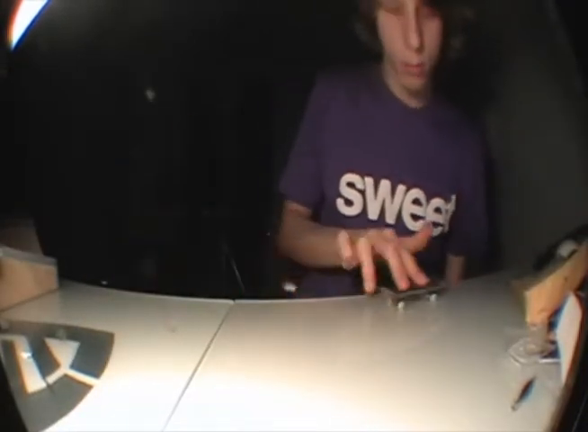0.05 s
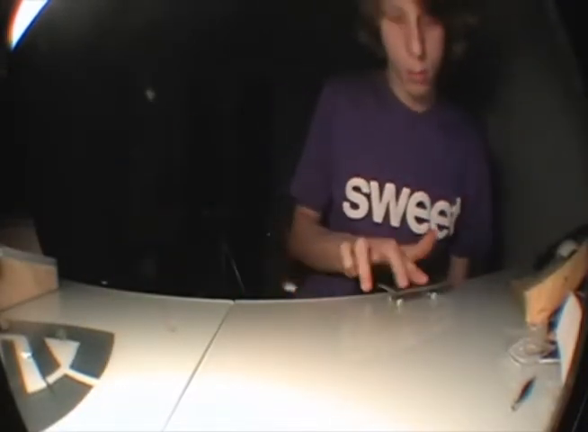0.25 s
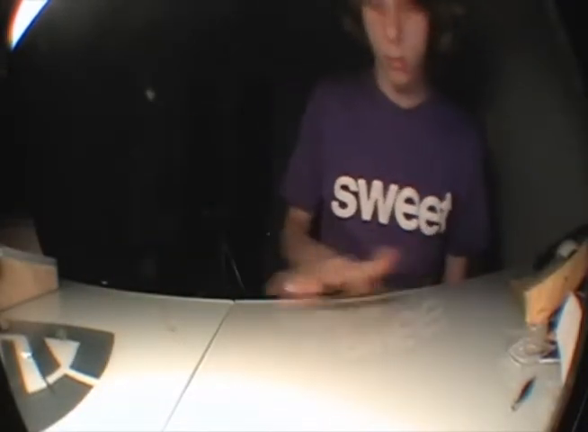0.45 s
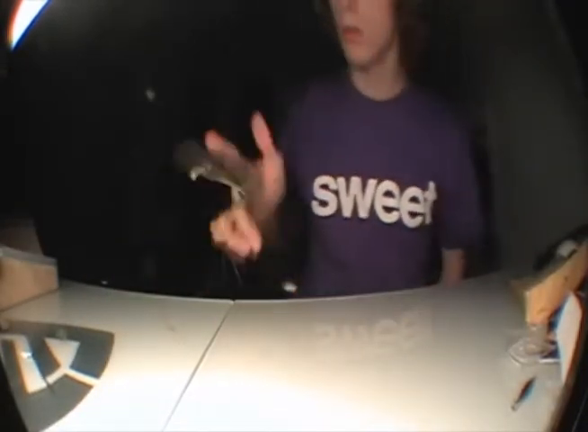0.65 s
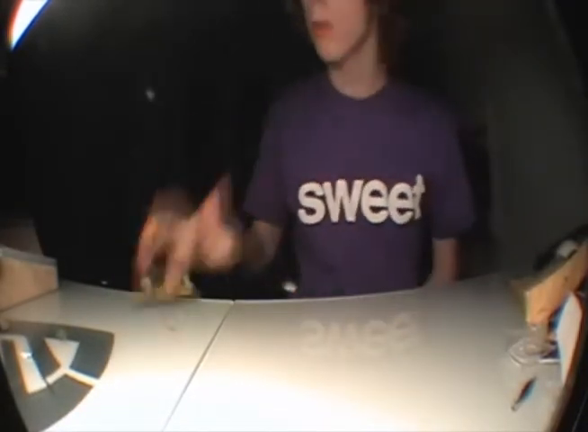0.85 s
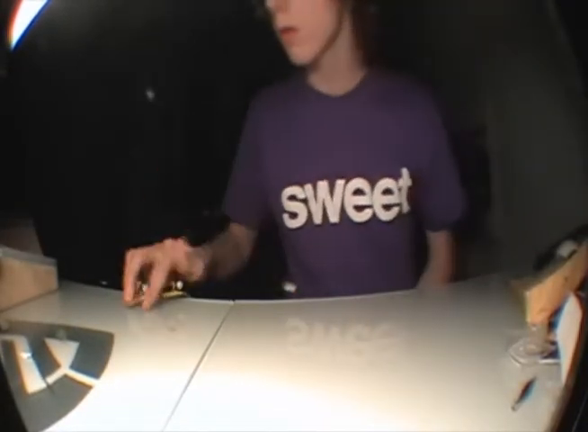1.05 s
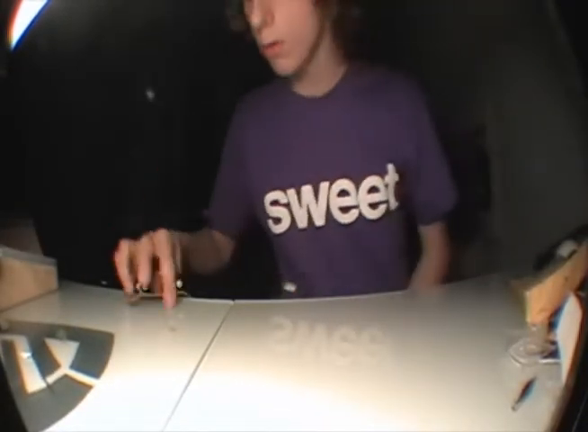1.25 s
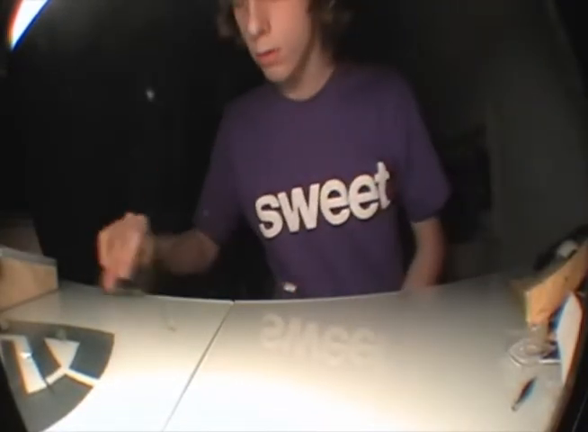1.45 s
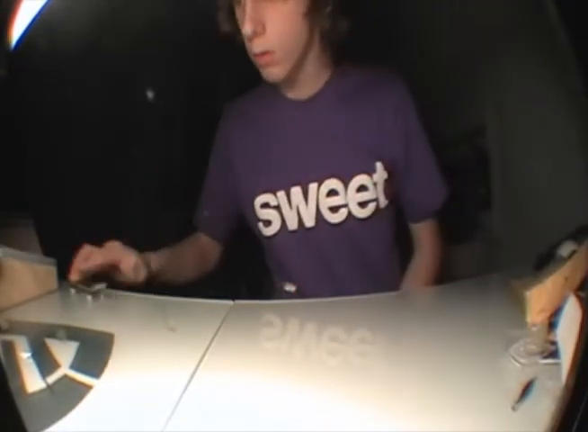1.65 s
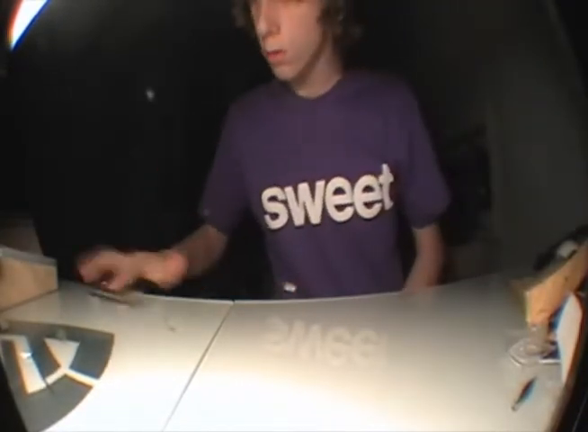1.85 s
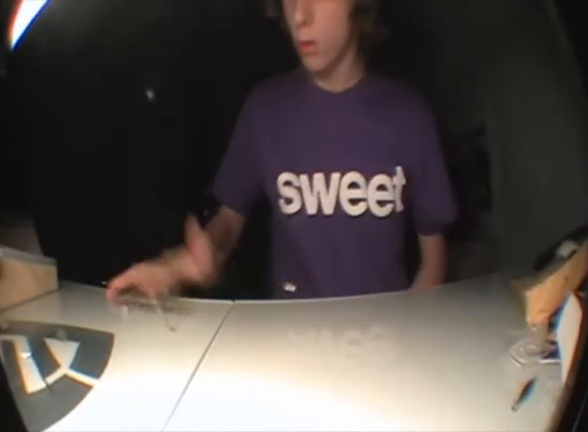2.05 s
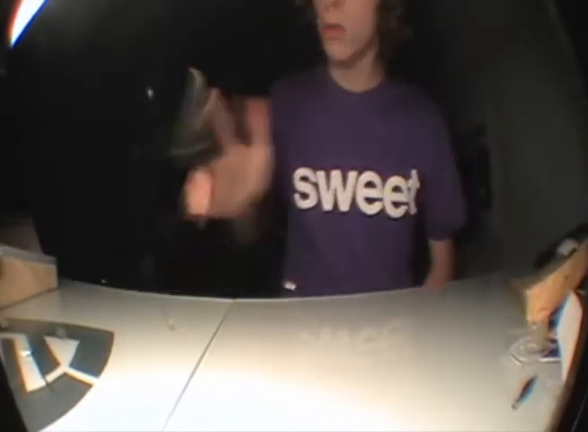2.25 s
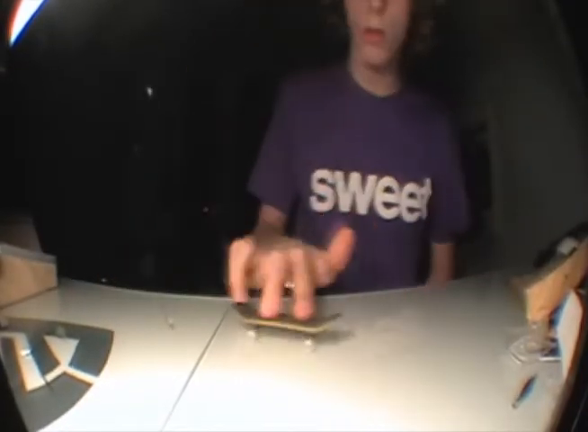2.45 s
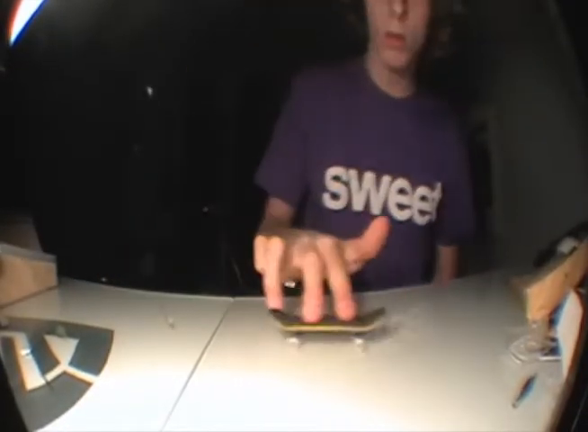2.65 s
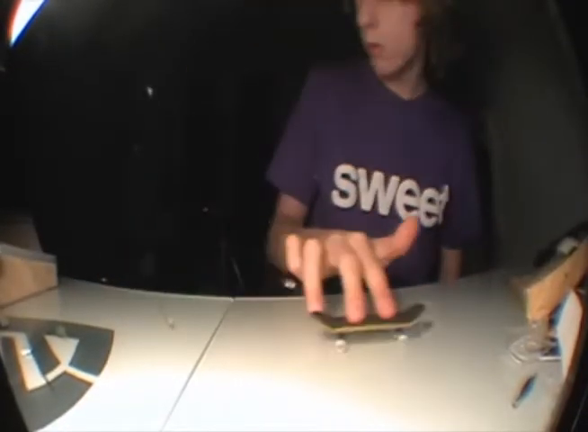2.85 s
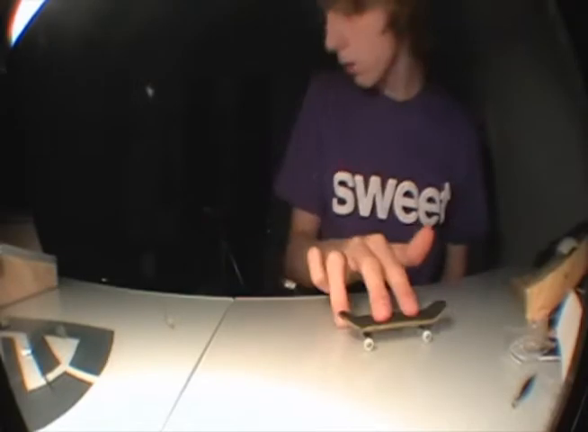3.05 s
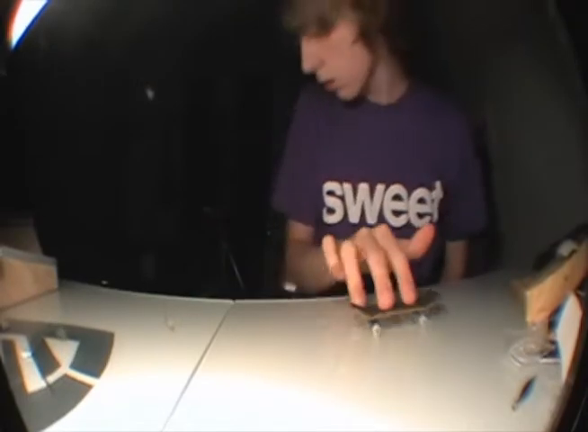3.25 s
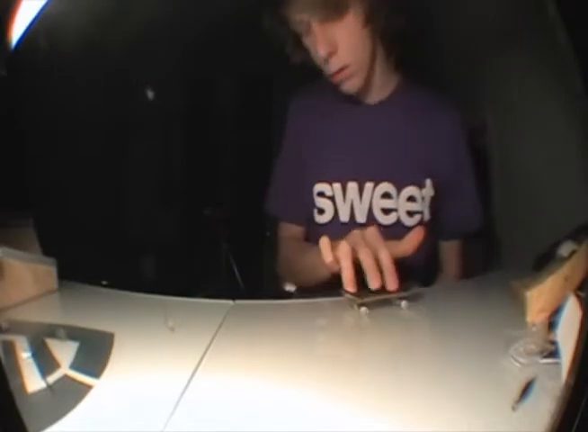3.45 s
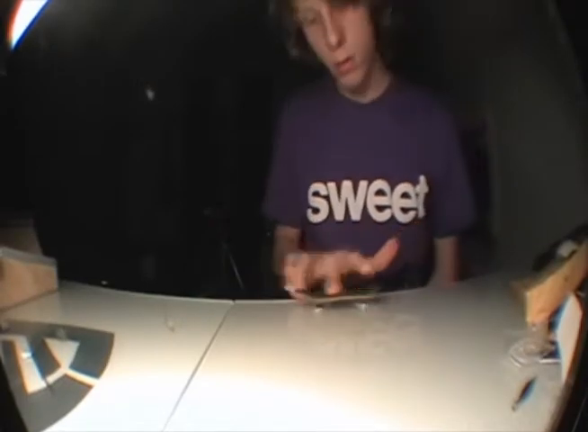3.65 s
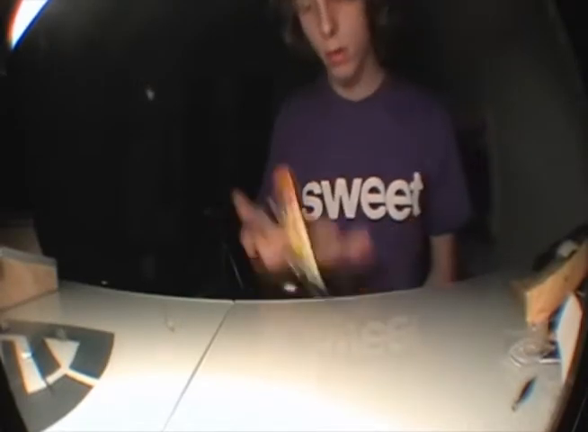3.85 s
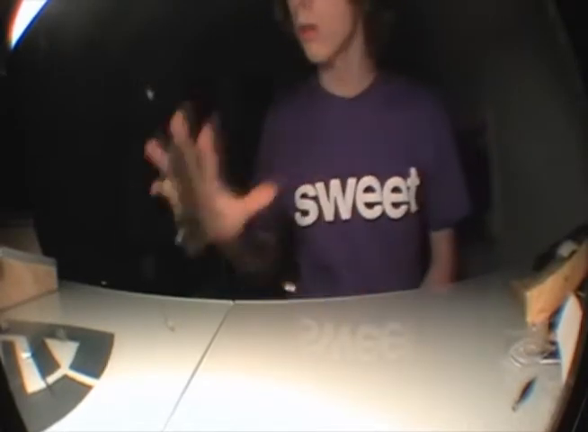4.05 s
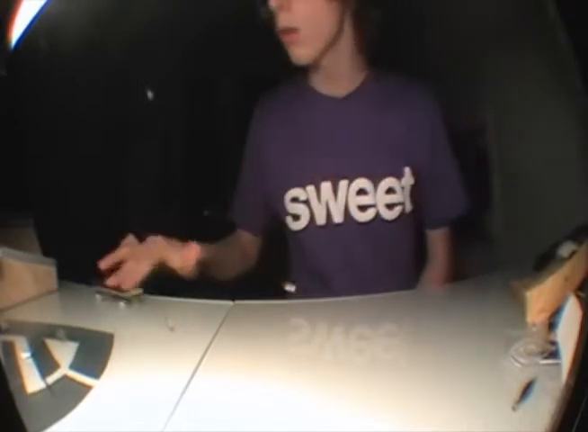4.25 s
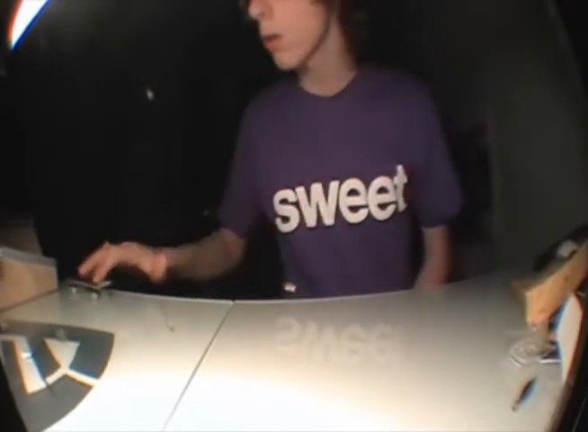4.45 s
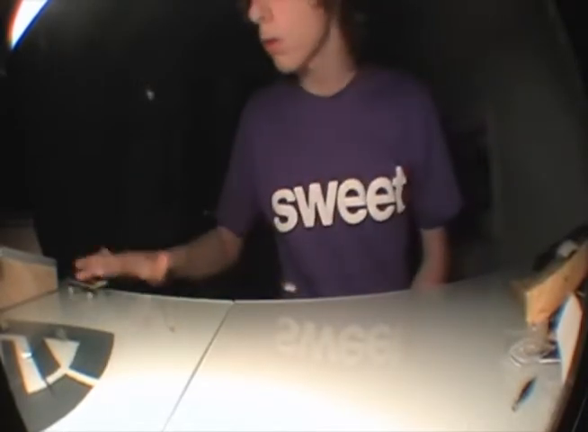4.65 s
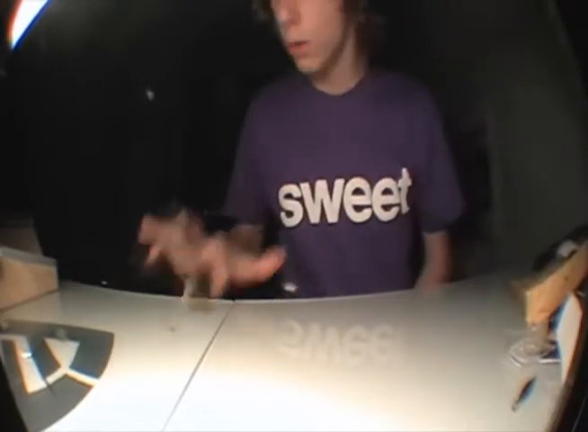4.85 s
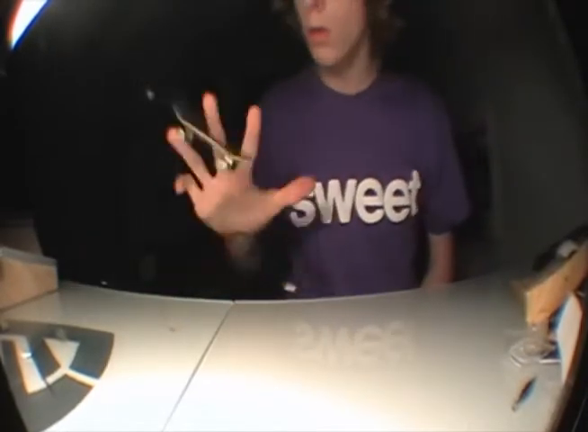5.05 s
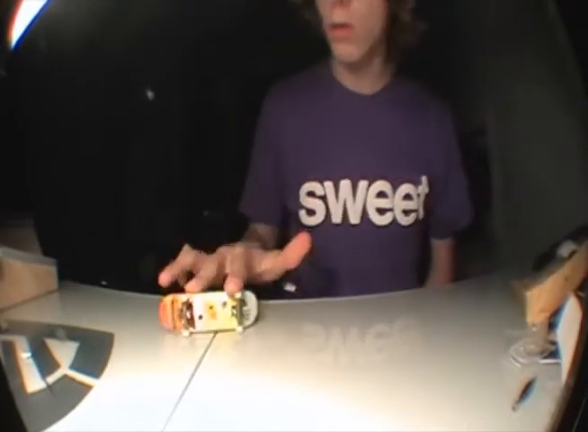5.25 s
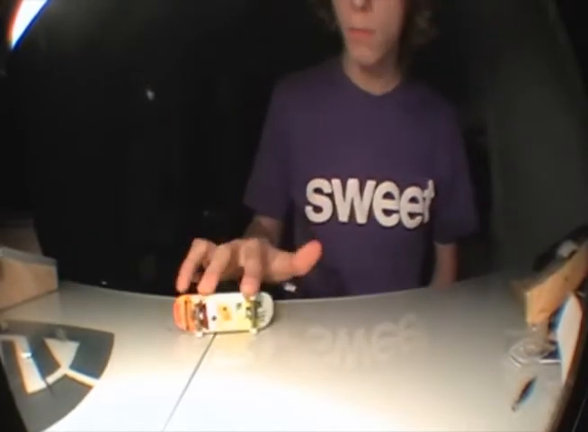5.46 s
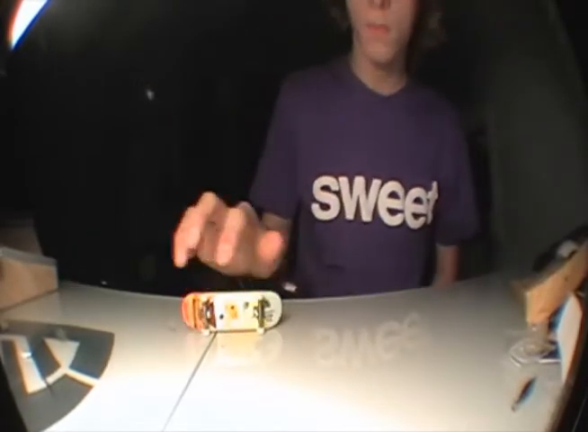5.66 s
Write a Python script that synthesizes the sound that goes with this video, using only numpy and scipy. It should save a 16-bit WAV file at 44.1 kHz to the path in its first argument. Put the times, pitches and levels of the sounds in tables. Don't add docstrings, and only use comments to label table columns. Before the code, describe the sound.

A toy skateboard rolls grittily on a tabletop, then pops, clatters down and scrapes through four quick tricks in a small quiet room.

```python
import sys
import numpy as np
from scipy import signal
from scipy.fft import rfft, irfft, next_fast_len
from scipy.io import wavfile
from scipy.ndimage import map_coordinates

SR = 44100
rng = np.random.default_rng(int(sys.argv[2]) if len(sys.argv) > 2 else 0)


def int16_out(signal):
    q = np.round(np.clip(np.atleast_2d(signal).T, -1, 1) * 32767)
    wavfile.write(sys.argv[1], SR, q.astype(np.int16))


def gain_from_db(level_db):
    decades = np.asarray(level_db, float) / 20
    return 10 ** decades


N = 251811

# frequency in Hz, level in dB per Hz.
ROOM_TONE = [(15, -47), (25, -7), (172, -2), (286, -6.5), (363, -6), (438, -17), (856, -18.5), (1090, -10),
             (2180, -27), (2560, -24), (3540, -26.5), (7090, -27.5), (12800, -36), (15000, -54.5)]
# frequency in Hz, time to fall 60 dB in seconds.
ROOM_DECAY = [(150, 0.17), (600, 0.24), (2000, 0.24), (6000, 0.25), (14000, 0.16)]
# frequency in Hz, level in dB.
ROOM_COLOUR = [(150, 3.5), (600, 2), (1500, -3), (4000, -3), (8000, -1.5), (15000, 4)]
# frequency in Hz, level in dB.
PORT_SIDE = [(40, -13), (150, -29.5), (1300, -15.5), (3000, -14), (6000, -13.5), (9000, -7.5), (14000, 4)]
# frequency in Hz, level in dB.
PORT_BALANCE = [(500, 0.7), (5000, 0), (12000, -3)]

# frequency in Hz, width in Hz, level in dB.
TABLE_TONES = [(155, 69, -6), (248, 90, -4.5), (370, 110, -1), (588, 100, 0)]
PANEL_TONES = [(165.8, 12, -1), (89, 27, -7)]
TRUCK_TONES = [(3640, 320, 0.5), (4400, 370, 1), (5850, 390, 1), (7290, 630, -0.5), (9100, 2200, -11.5)]
STRUCK_TRUCKS = [(3600, 1110, 6), (6320, 1400, 9.5), (7480, 1510, 9.5), (9200, 4440, 0.5),
                 (13200, 3500, -5.5)]
SLAMMED_TRUCKS = [(2400, 320, 4.5), (3700, 1200, 7.5), (6540, 2500, 5.5), (8500, 1800, 6.5),
                  (9800, 2500, 1.5), (13800, 2100, -6.5)]
SINGING_TRUCKS = [(3750, 300, 1.5), (4400, 520, 3), (4940, 180, -4.5), (5900, 190, -1.5)]
FREE_DECK = [(685, 55, -10), (1131, 87, 10.5), (1425, 250, 8.5), (1960, 1600, -5.5)]
PRESSED_DECK = [(1060, 270, -5.5), (1500, 330, 6.5), (1847, 360, 1.5)]
LOADED_DECK = [(704, 540, -2.5), (1910, 550, 4), (3070, 510, -15.5)]
STRUCK_DECK = [(719, 72, 0), (1296, 270, 4), (2273, 640, -2.5)]
FLAT_DECK = [(750, 970, -13), (1330, 450, 11.5), (2080, 760, 4.5)]
TILTED_DECK = [(1282, 670, -1.5), (1980, 450, 4.5), (3120, 980, -15)]
DRAG_HISS = [(3020, 1400, -2.5), (3890, 1000, 3.5), (4160, 1180, 2.5), (6000, 3400, -4), (8420, 1600, -5.5),
             (12200, 700, -17.5)]

# time in seconds, panel hum in dB.
HAND_WEIGHT = [(0.0, -62), (0.49, -61.5), (0.63, -63), (1.19, -65.5), (1.97, -61), (2.42, -59.5),
               (2.51, -65), (2.8, -72), (3.16, -64.5), (4.2, -75.5), (4.37, -59.5), (4.64, -67.5),
               (5.39, -69.5), (5.71, -69.5)]
# peak in seconds, half length in seconds, level in dB.
ARM_SWEEPS = [
    (2.41, 0.062, -63),
    (0.74, 0.07, -66),
    (2.3, 0.32, -57),
    (3.8, 0.076, -34.5),
]
# time in seconds, peak in
# dB, frequency in Hz.
TABLE_THUDS = [(0.319, -38.5, 144), (0.999, -21, 394.4), (1.029, -25, 373), (1.188, -45.5, 189),
               (1.359, -42, 151.6), (1.492, -21.5, 753), (1.85, -42, 88.6), (1.989, -57.5, 310),
               (2.205, -23.5, 405), (2.329, -45.5, 177), (2.483, -43, 203.8), (2.36, -49.5, 302),
               (2.4, -51, 246), (2.439, -50.5, 331), (2.45, -54.5, 145.3), (3.591, -44, 258),
               (3.829, -45, 86), (5.396, -50.5, 197)]
# time in seconds, speed as deck hum in dB.
ROLL_STROKES = [
    (-7, 0.15, [(0.0, -24.5), (0.1, -26.5), (0.162, -31.5), (0.235, -41), (0.304, -88), (0.314, -46.5), (0.412, -51), (0.42, -36), (0.5, -35)]),
    (-6.5, 0.28, [(1.51, -44), (1.572, -55.5), (1.61, -54.5)]),
    (-9.5, 0.15, [(1.705, -31.5), (1.801, -67.5), (1.839, -47.5), (1.861, -30.5), (1.9, -26)]),
    (-9.5, 0.72, [(2.66, -48.5), (2.718, -44.5), (2.976, -41.5), (2.998, -48), (3.046, -45.5), (3.09, -62.5), (3.24, -55)]),
    (-5.5, 0.15, [(3.26, -48), (3.278, -45.5), (3.346, -49), (3.364, -38), (3.408, -46.5), (3.46, -33), (3.47, -54), (3.526, -45)]),
    (-10, 0.11, [(3.556, -41.5), (3.65, -29.5), (3.696, -44.5), (3.736, -30), (3.798, -22.5), (3.9, -54)]),
    (-13, 0.57, [(4.35, -34.5), (4.404, -34.5), (4.448, -27), (4.504, -44), (4.54, -34), (4.58, -39), (4.656, -67)]),
    (-20.5, 0.37, [(4.785, -46.5), (4.797, -29.5), (4.85, -29)]),
]
# time in seconds, pressure from 0 to 1.
FINGER_PRESSURE = [(0.0, 0.3), (.13, 0.63), (.2, .15), (.46, 0.16), (1.7, 0.8), (1.83, 0.61), (2.7, 0.64),
                   (2.94, 0.83), (3.05, 0.07), (3.2, 1), (3.3, 0.14), (3.449, 1), (3.53, 0.7), (3.6, 0.5),
                   (3.73, 0.32), (3.85, 0.47), (4.35, 0.23), (4.5, 0.82)]
# peak in seconds, rise in seconds, peak in dB,
# deck resonance at the peak in Hz, rasp in dB against the deck.
DRAGS = [
    (0.584, 0.093, -18, 1380, 1.5),
    (2.04, 0.18, -17, 1562, -8.5),
    (2.152, 0.035, -26, 2020, -2),
    (3.925, 0.01, -32.5, 2250, 0),
    (4.899, 0.11, -20, 2004, 1),
    (1.24, 0.13, -65.5, 1810, 3.5),
    (1.452, 0.19, -63, 1850, 7.5),
    (5.55, 0.15, -62.5, 1913, 5.5),
]
# peak in seconds, fall in seconds, peak in dB,
# rasp in dB against the deck, deck resonance in Hz.
LANDING_SKIDS = [
    (2.58, 0.12, -25, -4, 1500),
    (4.3, 0.18, -24, -8.5, 1470),
    (5.335, 0.12, -26.5, -4, 1590),
]
# time in seconds, trucks peak in dB,
# deck in dB against the trucks, strongest ring in Hz.
AXLE_TICKS = [(0.0135, -29, -8, 3750), (0.0308, -7, -8, 5900), (0.0463, -15.5, 2, 5900),
              (0.063, -30, -12, 4130), (0.077, -9, -5, 4400), (0.0825, -12, -11, 3650),
              (0.094, -12, -13, 4100), (0.1292, -16, -6, 4050), (0.1582, -15.5, -8.5, 5700),
              (0.172, -32, -12, 4300), (0.1847, -11, -9, 4800), (0.1905, -19, -15.5, 5740),
              (0.4055, -34.5, -7, 5830), (0.418, -34, -4, 5630), (0.4294, -32, -10.5, 4330),
              (1.8549, -33, 16, 4140), (2.1344, -39, 3, 4500), (2.7438, -35, -0.5, 3820),
              (2.7696, -43, -2, 3850), (2.8025, -43, -4, 3790), (2.834, -34, -14, 4400),
              (2.848, -38, -8, 4300), (2.8759, -44, -14, 4350), (2.9125, -43, -7, 3660),
              (2.9481, -21, -16, 4280), (2.9692, -35.5, -13, 3700), (3.0265, -44, -6, 2840),
              (3.048, -41, -4, 3800), (3.2723, -33.5, 4, 4040), (3.3575, -29.5, -0.5, 4330),
              (3.378, -42, 10, 1340), (3.4145, -28, -5, 7200), (3.4379, -31, 2, 3640),
              (3.446, -38, 8, 1450), (3.4548, -27, 8, 1510), (3.501, -36.5, 8, 2210),
              (3.5317, -36, 1, 4200), (3.545, -26.5, 0, 4300), (3.5836, -21, -11.5, 4630),
              (3.6142, -14, -17.5, 4630), (3.637, -20, -6, 5600), (3.6466, -21, -6.5, 4460),
              (3.6998, -15, -21.5, 5730), (3.7221, -17.5, -12.5, 4200), (3.7390, -13, -6.5, 3950),
              (3.7601, -13, -9, 5630), (3.7975, -14.5, -8, 3650), (4.4514, -25.5, 11, 6470)]
FINGER_TAPS = [(0.3157, -52, 9, 5450), (0.3696, -42, -10, 5800), (1.1982, -32.5, -29, 6220),
               (1.3266, -39.5, -30.5, 3620), (1.3505, -40.5, -20.5, 2240), (1.389, -39.5, -28.5, 3550),
               (1.397, -36.5, -27, 6730), (1.17, -40, -19, 6000), (1.5893, -30, -27.5, 5530),
               (2.4861, -28.5, -11.5, 7980), (3.0964, -46, -14.5, 4280), (1.188, -40, -25, 5760),
               (5.231, -40, -28.5, 5850), (5.2345, -34, -25, 6300), (5.2395, -37, -21, 3480),
               (5.5638, -47.5, -16.5, 3480), (5.6246, -48, -4, 6340)]
# time in seconds, trucks peak in dB, deck in dB against the trucks,
# table in dB against the trucks, strongest ring in Hz.
TAIL_POPS = [
    (0.6509, 1, -18.5, -20.5, 6610),
    (0.6555, -4, -25, -25.5, 5870),
    (2.1956, 2, -17, -27, 3700),
    (2.2012, -6.5, -10, -12, 6630),
    (3.9238, -11.5, -9, -39, 4400),
    (3.9314, -1.5, -18, -24.5, 3750),
    (3.9330, -3.5, -12, -34, 5900),
    (3.9384, -12.5, -26, -45.5, 5230),
    (4.9516, -1.5, -20, -19, 6650),
    (4.9585, -21, -19.5, -7.5, 3630),
]
LANDINGS_FAR = [(0.9535, 2, -11, -25, 4310), (0.9676, -2.5, -15, -14.5, 4560),
                (0.9723, 0, -19.5, -35, 6330), (0.9925, -2, -9, -20.5, 7450),
                (0.9991, -11.5, -3.5, -8, 3300), (4.2304, -0.5, -10.5, -17, 7590),
                (4.2316, -3.5, -16.5, -23.5, 2250), (4.238, -17, -11.5, -25, 5800),
                (4.2615, 6, -7.5, -26, 4700), (4.2636, -0.5, -6, -19.5, 1480),
                (4.2685, -6.5, 1.5, -14.5, 1330), (4.272, -14, -8.5, -25.5, 5500)]
LANDINGS_NEAR = [
    (2.5284, 2, -13.5, -19.5, 2327),
    (2.5308, -3, -2, -28.5, 2400),
    (2.5337, 4, -10, -30.5, 2400),
    (2.5362, -11.5, -4.5, -24.5, 2400),
    (2.5398, -2, -4.5, -23.5, 8500),
    (5.2825, 4.5, -6.5, -19, 3490),
    (5.2855, -2, -3, -18.5, 1860),
    (5.2897, -0.5, -3.5, -21, 3600),
    (5.2972, -3.5, -14.5, -29, 3700),
]
BOARD_SET_DOWN = [
    (1.4826, -20.5, 6, -26, 1900),
    (1.4848, -7, -1, -13.5, 1920),
    (1.4858, -19, -0.5, -20.5, 2800),
    (1.4884, -11.5, -8, -8.5, 6350),
    (1.506, -19.5, -16, -21, 6110),
    (1.6337, -7, -10, -22.5, 6670),
    (1.6350, -13.5, -8, -22, 2730),
    (1.6886, -9, 1, -17, 1580),
    (1.6918, -6.5, -5.5, -24, 7700),
]


def unit(x):
    return x / np.sqrt(np.mean(x ** 2) + 1e-20)


def along(points, hz):
    f, v = np.transpose(points)
    return np.interp(np.log(hz + 1), np.log(f + 1), v)


def filtered(x, response):
    m = next_fast_len(x.shape[-1] + 8192)
    return irfft(rfft(x, m) * response(np.fft.rfftfreq(m, 1 / SR)), m)[..., :x.shape[-1]]


def body(modes):
    def response(f):
        total = 0
        for k, (center, width, db) in enumerate(modes):
            loss = 1j * f * abs(width)
            total = total + (-1) ** k * gain_from_db(db) * loss / (center * center - f * f + loss + 1)
        return total
    return response


def wobble(count):
    knots = rng.standard_normal(int(N * count / SR) + 4)
    return np.clip(map_coordinates(knots, [np.arange(N) * count / SR]), -2, 2)


def echo(x):
    hz, t, z = signal.stft(rng.standard_normal((2, SR // 2)), SR, nperseg=256)
    fade_db = 60 * t / along(ROOM_DECAY, hz)[:, None]
    shape = gain_from_db(along(ROOM_COLOUR, hz)[:, None] - fade_db) * (1 - np.exp(-t / 0.016))
    tail = signal.istft(z * shape, SR, nperseg=256)[1][:, :SR // 2]
    return signal.fftconvolve(x[None], tail / np.linalg.norm(tail[0]), axes=1) * [[1], [.6]]


def room_tone():
    hush = filtered(rng.standard_normal((2, N)), lambda f: gain_from_db(along(ROOM_TONE, f)))
    return gain_from_db(-58.5) * hush / np.std(hush[0])


def tabletop():
    t = np.arange(N) / SR
    s, panel_db = np.transpose(HAND_WEIGHT)
    panel = gain_from_db(np.interp(t, s, panel_db) + 4.5 + 1.5 * wobble(9.2))
    moving_db = np.maximum(speed()[0], effort()[0])
    rest_db, moved_db, growth = -76, -58.5, 0.44
    rumble = gain_from_db(rest_db) + gain_from_db(moved_db + growth * (moving_db + 29.5))
    rumble = rumble * gain_from_db(1.8 * np.tanh(wobble(count=15)))
    for s, half, db in ARM_SWEEPS:
        rumble = rumble + gain_from_db(db) * np.exp(-((t - s) / half) ** 2)
    noise = rng.standard_normal((2, 2, N))
    hum = unit(filtered(noise[0], lambda f: body(PANEL_TONES)(f) ** 2))
    shaking = unit(filtered(noise[1], lambda f: body(TABLE_TONES[1:])(f) / (1 + 1j * f / 420) ** 2))
    return panel * hum + rumble * shaking


def thuds():
    out, t = np.zeros(N + SR), np.arange(4000) / SR
    for s, db, hz in TABLE_THUDS:
        push = gain_from_db(db + 4.5 - 60 * t / 0.05) * np.sin(2 * np.pi * hz * t)
        out[round(s * SR):][:len(t)] += push * (1 - np.exp(-t / 0.002))
    return out[:N]


def speed():
    points = [(s, db, db + hiss_db, bright) for hiss_db, bright, span in ROLL_STROKES for s, db in span]
    s, hum_db, hiss_db, bright = np.transpose(points)
    t = np.arange(N) / SR
    ends = [span[-1][0] for *_, span in ROLL_STROKES]
    starts = [span[0][0] for *_, span in ROLL_STROKES[1:]] + [N]
    off_db = np.zeros(N)
    for a, b in zip(ends, starts):
        if b - a > .05:
            off_db -= 150 * np.clip(np.minimum(t - a, b - t) / .03, 0, 1)
    return np.interp(t, s, hum_db) + off_db, np.interp(t, s, hiss_db) + off_db, np.interp(t, s, bright)


def effort():
    lift_s, settle_s = 0.075, 0.045
    rows = [(s, rise, min(rise, lift_s), db, hz, rasp_db) for s, rise, db, hz, rasp_db in DRAGS]
    rows += [(s, settle_s, fall, db, hz, rasp_db) for s, fall, db, rasp_db, hz in LANDING_SKIDS]
    s, rise, fall, peak_db, peak_hz, rasp_db = np.transpose(rows)[..., None]
    late = np.arange(N) / SR - s
    hold = 0.2
    away = np.maximum(np.abs(late) / np.where(late < 0, rise, fall) - hold, 0)
    loss_db = 28.5 * away ** np.where(late < 0, 1.56, 1.33)
    deck_db = peak_db - loss_db
    flat_hz, tilt_fade_db = 1200, 19.5
    tilt = np.clip(1.5 - (late < 0) * loss_db / tilt_fade_db, 0, 1)
    hz = flat_hz + (peak_hz - flat_hz) * tilt
    hiss_db = deck_db + rasp_db - 0.54 * loss_db
    pick = np.argmax(deck_db, axis=0), np.arange(N)
    return deck_db[pick], hiss_db[pick], hz[pick]


def rattle(db):
    rattles_per_s, t60_s = 82, 0.026
    knocks = (rng.random(N) < rattles_per_s / SR) * np.minimum(rng.exponential(1, N), 2)
    return 1 + gain_from_db(db) * signal.lfilter([1], [1, -gain_from_db(-60 / (t60_s * SR))], knocks)


def grit(density, spread_db):
    size = gain_from_db(spread_db * np.minimum(rng.exponential(1, N), 4))
    bumps = (rng.random(N) < density / SR) * size * rng.choice([-1, 1], N)
    return unit(bumps) + .5 * rng.standard_normal(N)


def grind(low_db, high_db, decks, metals, throb_db, top_hz, spread_db, turn_hz, edge_hz):
    turn = np.cumsum(turn_hz * (1 + 0.22 * wobble(11.0))) / SR
    throb = throb_db * (1.0 * np.sin(2 * np.pi * turn) + .5 * wobble(40) + .5 * wobble(150))
    road = grit(density=2500, spread_db=spread_db)

    def edges(f):
        return f ** 2 / (f + 2500j) ** 2 / (1 + 1j * f / top_hz) ** 2 / (1 + (f / 13000) ** 6)

    def dulled(f):
        return f / (f + 500j) / (1 + 1j * f / 3000) / (1 + (f / edge_hz) ** 10)

    metal, wood = 0, 0
    for share, modes in metals:
        scrape = 0.097 * road + grit(density=7100, spread_db=spread_db)
        metal = metal + share * unit(filtered(scrape, lambda f: body(modes)(f) * edges(f)))
    for share, modes in decks:
        wood = wood + share * unit(filtered(road, lambda f: body(modes)(f) * dulled(f)))
    metal_gain = gain_from_db(high_db + 1.4 * throb + 0.33 * throb_db * wobble(120))
    return gain_from_db(low_db + throb) * wood + metal_gain * metal


def rolling():
    hum_db, axle_db, bright = speed()
    knocked_db = 20 * np.log10(rattle(db=-0.5))
    press = np.interp(np.arange(N) / SR, *np.transpose(FINGER_PRESSURE)) + 0.2 * wobble(17)
    press = np.clip(press, 0, 1) * np.pi / 2
    decks = [(1.34 * np.cos(press), FREE_DECK), (1.04 * np.sin(press), PRESSED_DECK), (bright, LOADED_DECK)]
    return grind(hum_db + 0.57 * knocked_db - 2.0, axle_db + knocked_db - 1.5, decks, [(0.94, TRUCK_TONES)],
                 throb_db=1.23, top_hz=6500, spread_db=3.0, turn_hz=60.0, edge_hz=2650)


def dragging():
    deck_db, hiss_db, hz = effort()
    hz = hz + 80 * wobble(25)
    tilt = np.clip((hz - 1250) / 800, 0, 1) * np.pi / 2
    decks = [(np.cos(tilt), FLAT_DECK), (np.sin(tilt), TILTED_DECK)]
    hiss = [(0.75, DRAG_HISS), (0.64 * np.cos(tilt) ** 2, SINGING_TRUCKS)]
    return grind(deck_db, hiss_db, decks, hiss,
                 throb_db=1.24, top_hz=14100, spread_db=1.7, turn_hz=128.6, edge_hz=9100)


def contacts(rows, room_db, metal, top_hz, t60, ring_db):
    near, far, t = np.zeros(N + SR), np.zeros((2, N + SR)), np.arange(9000) / SR

    def steel(x):
        return 0.89 * filtered(x, lambda f: body(metal)(f) / (1 + 1j * f / top_hz) ** 2)

    for s, db, deck_db, table_db, ring_hz in rows:
        rough = rng.standard_normal((4, len(t)))
        shape = gain_from_db(-60 * t / t60) * (1 - np.exp(-t / 0.00032))
        snap = np.linalg.norm(shape) * (np.arange(len(t)) == 14)
        blow = 0.92 * rough[:2] * shape + 0.31 * snap
        chatter = 0.21 * rough[2] * gain_from_db(-60 * t / 0.052)
        bloom = 0.61 * rough[3] * gain_from_db(-60 * t / 0.13) * (1 - np.exp(-t / 0.0014))
        push = np.exp(-t / 0.00054) + bloom
        thump = filtered(push, lambda f: body(TABLE_TONES)(f) / (1 + 1j * f / 900))
        thump = gain_from_db(table_db + 16.0) * thump
        wood_gain = gain_from_db(deck_db + 12.0)
        wood = wood_gain * filtered(blow[1] + chatter, body(STRUCK_DECK))
        ring = filtered(snap + 0.34 * blow[0], body([(ring_hz, 0.045 * ring_hz, 0)]))
        ring = gain_from_db(ring_db + 2) * ring
        wood_around = wood_gain * filtered(1.28 * snap, body(STRUCK_DECK))
        wet = gain_from_db(db + room_db) * echo(steel(snap) + wood_around + thump)
        start = round(s * SR)
        near[start:][:len(t)] += gain_from_db(db) * (steel(blow[0]) + wood + thump + ring)
        far[:, start:][:, :wet.shape[1]] += wet
    return np.vstack([near[:N], far[:, :N]])


def light_touches(rows, gain_db, room_db, metal, top_hz, t60, ring_db):
    table_db = -37.5
    full = [(s, db + gain_db, deck_db - gain_db - 2, table_db, hz) for s, db, deck_db, hz in rows]
    return contacts(full, room_db, metal, top_hz=top_hz, t60=t60, ring_db=ring_db)


def hard_hits():
    hard = dict(top_hz=50000, t60=0.014)
    return (contacts(TAIL_POPS, -10, STRUCK_TRUCKS, ring_db=5, **hard)
            + contacts(LANDINGS_FAR, -6.5, STRUCK_TRUCKS, ring_db=5, **hard)
            + contacts(LANDINGS_NEAR, -12, SLAMMED_TRUCKS, ring_db=10, **hard)
            + contacts(BOARD_SET_DOWN, -11, STRUCK_TRUCKS, ring_db=9, **hard))


def scene():
    ticks = light_touches(AXLE_TICKS, 7, -14, TRUCK_TONES, top_hz=8000, t60=.009, ring_db=0)
    taps = light_touches(FINGER_TAPS, -1.5, -8, STRUCK_TRUCKS, top_hz=7000, t60=.022, ring_db=9.5)
    hits = hard_hits() + ticks + taps
    roll = rolling() + dragging()
    table = tabletop()
    diffuse = hits[1:] + gain_from_db(-8.0) * echo(roll)[:, :N] + room_tone()
    mid = hits[0] + roll + table[0] + thuds() + diffuse[0]
    side = gain_from_db(3.0) * filtered(diffuse[1] + 1.6 * table[1], lambda f: gain_from_db(along(PORT_SIDE, f)))
    return np.array([mid + side, mid - side])


def roll_off(x):
    return signal.sosfilt(signal.butter(12, 16400, fs=SR, output="sos"), x)


def record(dry):
    side = filtered(dry.mean(axis=0), lambda f: 1j * gain_from_db(along(PORT_SIDE, f) + 2.5) * np.cos(f / 900))
    halves = np.array([[.5], [-.5]])
    x = filtered(dry + [side, -side], lambda f: gain_from_db(along(PORT_BALANCE, f) * halves))
    x = x + gain_from_db(-85.0) * rng.standard_normal(x.shape)
    x = filtered(x, lambda f: (f / (f - 30j)) ** 2)
    x = x / (1 + np.abs(x / .95) ** 6) ** (1 / 6)
    x = filtered(x, lambda f: np.clip((16400 - f) / 1300, 0, 1))
    return roll_off(x)


dry = scene()
out = record(dry)
int16_out(out)
```